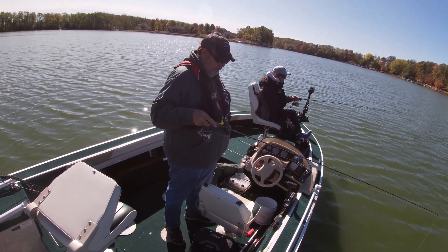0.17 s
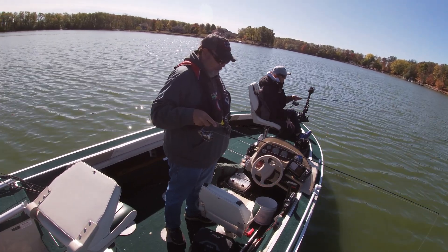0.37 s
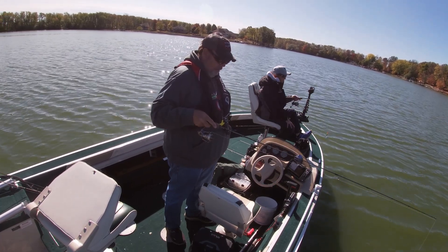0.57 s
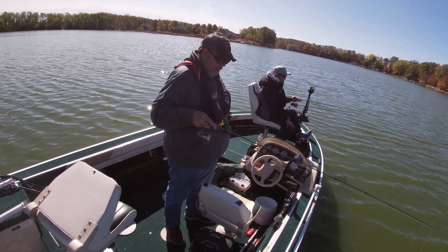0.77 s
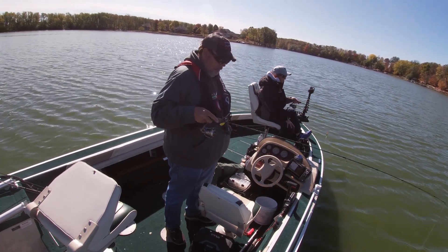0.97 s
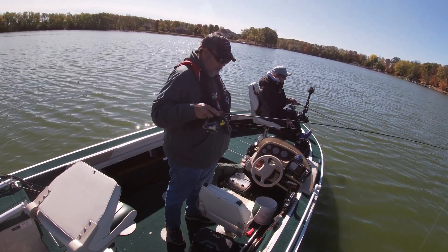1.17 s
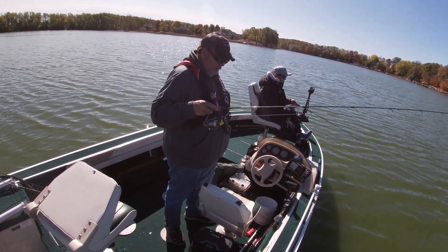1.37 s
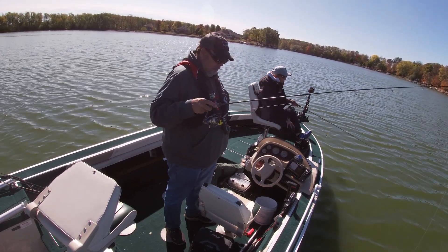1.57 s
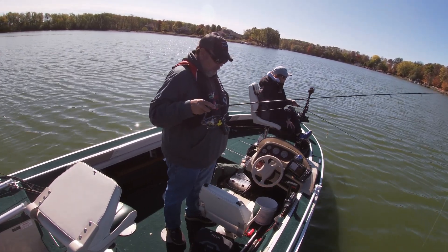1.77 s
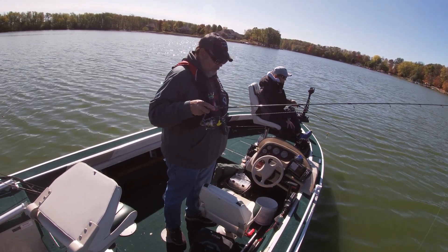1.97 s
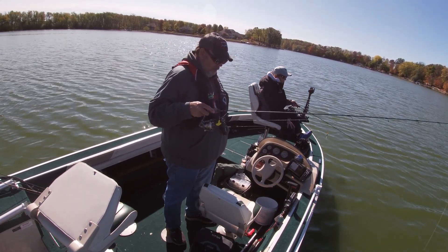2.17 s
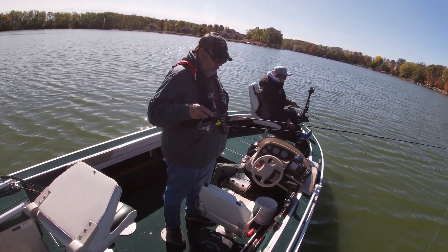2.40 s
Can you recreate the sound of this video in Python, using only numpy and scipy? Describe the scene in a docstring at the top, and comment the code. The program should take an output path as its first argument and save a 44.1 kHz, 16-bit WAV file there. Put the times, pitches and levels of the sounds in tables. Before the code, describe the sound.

Small waves slap a hollow boat hull on an open lake. Dull low knocks with watery plips, tiny gurgles and faint spray cluster from 0.1 to 0.5 seconds, thin out until 1.3, then return, stronger around 1.9 and 2.4. A soft wash continues beneath. Low wind rumbles on the microphone, strongest near 1.2 to 1.3 seconds, over quiet steady hiss and a thin electrical flutter.

```python
"""Lake waves under a boat

Small waves slap a hollow hull: decaying sines ring its modes under a dull burst of noise.
Trapped air plips, gulps and gurgles as short gliding or clustered tones; spray spits in bands of noise.
Light wind rumbles on the microphone in gusts, and ripples keep up a faint wash against the hull.
Under it lie the camera's steady hiss and a thin electrical flutter, both of shaped noise."""
import sys
import numpy as np
from scipy.fft import rfft, irfft, next_fast_len
from scipy.io import wavfile
from scipy.ndimage import uniform_filter1d, map_coordinates

SR = 44100
rng = np.random.default_rng(int(sys.argv[2]) if len(sys.argv) > 2 else 0)


def dump(signal):
    """Clip the signal to [-1, 1] and save it as 16-bit WAV at the path in sys.argv[1]."""
    limited = np.clip(np.atleast_2d(signal).T, -1, 1)
    pcm = np.round(limited * 32767).astype(np.int16)
    wavfile.write(sys.argv[1], SR, pcm)


N = 107471  # length in samples


def amp(db):
    """Decibels to gain."""
    return 10 ** (np.asarray(db) / 20)


def unit(x):
    """Scale to rms 1."""
    return x / np.sqrt(np.mean(x ** 2) + 1e-20)


def along(points, hz):
    """Read (Hz, value) points on a log-frequency axis."""
    point_hz, value = np.transpose(points)
    return np.interp(np.log(hz + 1), np.log(point_hz + 1), value)


def filtered(x, response):
    """Multiply the spectrum of x by a response of frequency, padded so that no tail wraps round."""
    size = next_fast_len(N + SR // 2)
    hz = np.fft.rfftfreq(size, 1 / SR)
    return irfft(rfft(x, size) * response(hz), size)[:N]


def noise(spectrum):
    """Noise of rms 1 coloured by (Hz, dB) points."""
    white = rng.standard_normal(N)
    return unit(filtered(white, lambda hz: amp(along(spectrum, hz))))


def wobble(rate):
    """A smooth random curve through `rate` random knots a second."""
    knots = rng.standard_normal(int(N * rate / SR) + 4)
    return map_coordinates(knots, [np.arange(N) * rate / SR])


def fade(t, t60, attack):
    """Soft onset at t = 0, then exponential decay by 60 dB in t60 seconds."""
    t = np.maximum(t, 0)
    decay = np.exp(-np.log(1000) * t / t60)
    return decay * (1 - np.exp(-t / attack))


def add(track, s, sound):
    """Mix a sound into the track at time s, cut off at the track's end."""
    part = track[max(round(s * SR), 0):][:len(sound)]
    part += sound[:len(part)]


def hull():
    """Each wave gives a dull slap and rings the hull's modes, randomly coloured and detuned each time."""
    # wave slaps, relative ring levels: start_s, low_db, middle_db, upper_db
    knocks = [(0.108, -38.5, -36.5, -58), (0.128, -36, -49.5, -63), (.174, -48.5, -64, -61),
              (0.265, -41, -42, -60), (0.408, -54, -53.5, -72), (.5, -97, -56, -65.5),
              (0.714, -81, -46.5, -70), (.858, -58, -57, -64.5), (1.312, -50, -54, -58),
              (1.334, -46, -45.5, -79), (1.354, -50, -68.5, -62.5), (1.589, -45.5, -52, -57),
              (1.758, -57.5, -58, -67), (1.897, -38.5, -46, -62.5), (1.921, -37.5, -40.5, -59),
              (1.968, -56, -51, -74), (2.214, -51, -54.5, -67), (2.339, -44.5, -52, -52),
              (2.395, -37, -39.5, -48.5), (2.418, -39, -56, -58)]
    # modes of the hull at rest: pitch_hz, relative_level_db, t60_s
    hull_modes = [(142.3, -9, 0.25), (186.2, 2, 0.13), (213.2, 4, 0.097), (306.6, -1, 0.097),
                  (344.3, -2, 0.13), (360.4, -2, 0.11), (405, -13, 0.091), (496, 0, 0.093), (557, -12, 0.2),
                  (668, -1.5, 0.07), (736.5, -9, 0.098)]
    # pitches at which a knock's three ring levels apply: pitch_hz
    ring_hz = [182, 330.5, 525]
    # colour of the dull slap: frequency_hz, relative_level_db
    slap_colour = [(60, -6.5), (150, 10.5), (350, -3), (480, -29), (800, -29.5), (1500, -23.5), (4000, -64)]
    waterline_detune = 0.035  # spread of each mode's shift from wave to wave, as a share of its pitch
    knock_trim_db, knock_attack_cycles, mode_scatter_db = -1.5, 2.5, 2.5
    slap_trim_db, slap_t60_s, slap_attack_s = -9, 0.11, 0.0021

    out, t = np.zeros(N), np.arange(SR // 3) / SR
    force, clock = np.zeros(N), np.arange(N) / SR
    rest_hz, mode_db, t60 = np.transpose(hull_modes)
    for s, *ring_db in knocks:
        hz = rest_hz * np.exp(waterline_detune * rng.standard_normal(len(rest_hz)))
        envelopes = fade(t, t60[:, None], knock_attack_cycles / hz[:, None])
        modes = np.sin(2 * np.pi * hz[:, None] * t) * envelopes
        colour_db = np.interp(np.log(hz), np.log(ring_hz), ring_db)
        colour_db += mode_scatter_db * rng.standard_normal(len(hz))
        add(out, s, amp(knock_trim_db + mode_db + colour_db) @ modes)
        # the middle ring level also sets how hard the wave slaps
        force += amp(ring_db[1]) * fade(clock - s, slap_t60_s, slap_attack_s)
    return out + amp(slap_trim_db) * force * noise(slap_colour)


def plips():
    """Single air pockets ring briefly and glide up or down as they change size."""
    # air pockets: start_s, pitch_hz (at the start), level_db, t60_s, rise_octaves_per_s
    pockets = [(0.1004, 1450, -43, 0.013, -3), (.19, 990, -54.5, 0.043, 4), (.205, 717, -56, 0.078, -2),
               (.219, 391, -57, 0.068, 2), (.311, 1286, -70, 0.084, 26), (.325, 900, -60.5, 0.024, -7),
               (.377, 1980, -64.5, 0.036, -6), (.406, 385, -59.5, 0.079, -1), (.497, 734, -51, 0.033, 8),
               (.502, 374, -58.5, 0.035, 9), (.717, 770, -57, 0.025, 3), (.729, 741, -59.5, 0.054, 1.5),
               (.866, 482, -55.5, 0.04, 6), (.9295, 2910, -55.5, 0.011, 10), (1.24, 933, -62, 0.044, 4.5),
               (1.289, 779, -50.5, 0.043, -5), (1.312, 483, -52.5, 0.057, -9.5), (1.59, 485, -56, 0.06, 4),
               (1.621, 1745, -58.5, 0.027, 2), (1.691, 4670, -61.5, 0.04, -5),
               (1.701, 786, -49.5, 0.013, 2), (1.709, 788, -55, 0.045, -2.5),
               (1.714, 2830, -61.5, 0.019, -4), (1.742, 897, -53.5, 0.047, 4),
               (1.757, 314.5, -49.5, 0.12, -0.5), (1.922, 675, -56, 0.05, 2),
               (2.206, 1160, -51.5, 0.011, -19), (2.338, 625, -54.5, 0.058, 3.5),
               (2.398, 597, -56, 0.036, 11.5)]
    out, t = np.zeros(N), np.arange(SR // 12) / SR
    for s, hz, db, t60, rise in pockets:
        phase = 2 * np.pi * np.cumsum(hz * 2 ** (rise * t)) / SR
        add(out, s, amp(db) * np.sin(phase) * fade(t, t60, attack=0.0012))
    return out


def gulps():
    """A cavity sings while it fills with water: the pitch climbs ever faster until it closes."""
    # filling cavities: start_s, length_s, first_pitch_hz, last_pitch_hz, level_db (before the waver)
    cavities = [(.157, 0.038, 872, 1704, -64), (0.218, 0.031, 960, 2320, -73.5)]
    curve, edge_s, waver_db = 1.6, 0.0061, 3.5
    out, clock = np.zeros(N), np.arange(N) / SR
    for s, length, first_hz, last_hz, db in cavities:
        t = clock - s
        filling = np.clip(t / length, 0, 1) ** curve
        hz = first_hz * (last_hz / first_hz) ** filling
        swell = np.clip(np.minimum(t, length - t) / edge_s, 0, 1)
        tone = np.sin(2 * np.pi * np.cumsum(hz) / SR)
        out += amp(db + waver_db * wobble(200)) * swell * tone
    return out


def gurgles():
    """Water folding against the side sheds clusters of tiny bubbles, each a short decaying sine."""
    # bubble clusters: start_s, length_s, centre_pitch_hz, weakest_bubble_db
    clusters = [(0.091, .016, 1400, -73), (0.152, 0.053, 533, -72), (0.176, .044, 983, -77),
                (0.276, .032, 726, -78), (0.365, 0.019, 1920, -78.5), (0.503, 0.019, 1300, -79),
                (1.287, .03, 695, -72.5), (1.618, 0.011, 1460, -73), (1.727, 0.022, 1290, -74),
                (1.909, .035, 698, -73)]
    bubbles_per_s = 660
    bubble_cycles = 18.7  # cycles in which a bubble falls by 60 dB
    bubble_spread = 0.29  # standard deviation of the natural log of pitch
    out, t = np.zeros(N), np.arange(SR // 20) / SR
    for s, length, hz, db in clusters:
        draws = rng.random((64, 3))
        count = int(np.clip(length * bubbles_per_s, 2, len(draws)))
        for k, (late, size, strength) in enumerate(draws[:count]):
            # sqrt(12) brings the uniform draw to a standard deviation of 1
            pitch = hz * np.exp(bubble_spread * np.sqrt(12) * (size - .5))
            ring = np.sin(2 * np.pi * pitch * t) * fade(t, bubble_cycles / pitch, 1 / pitch)
            start = s + length * (k + late) / count
            add(out, start, amp(db + 17.9 * strength) * ring)
    return out


def splashes():
    """Droplets and crests breaking on the side: grainy spits of noise in a broad band round a pitch."""
    # spits of spray: start_s, centre_hz, level_db (before the fade), t60_s
    spits = [(0.099, 3400, -70.5, 0.048), (0.191, 1900, -68, 0.042), (0.265, 3230, -67, 0.04),
             (0.496, 2130, -58.5, 0.018), (1.289, 3660, -67.5, 0.11), (1.328, 1600, -60, 0.023),
             (1.392, 2640, -67.5, .025), (1.7, 4400, -64, 0.057), (1.747, 1610, -61.5, 0.02),
             (1.92, 3180, -65, .02), (2.078, 750, -59, 0.0099), (2.207, 1040, -59.5, 0.04)]
    half_width_octaves, grain_db = .55, 3
    out, t = np.zeros(N), np.arange(SR // 8) / SR
    octave = np.log2(np.fft.rfftfreq(len(t), 1 / SR) + 1)
    for s, hz, db, t60 in spits:
        band = np.exp(-((octave - np.log2(hz)) / half_width_octaves) ** 4)
        drops = rng.standard_normal(len(t)) * amp(grain_db * wobble(842)[:len(t)])
        spray = unit(irfft(rfft(drops) * band, len(t)))
        add(out, s, amp(db) * spray * fade(t, t60, attack=.0015))
    return out


def wash():
    """Ripples keep the hull murmuring between the slaps: coloured noise that swells slightly."""
    # how hard the ripples stir the hull: time_s, level_db (before the swell)
    ripples = [(0, -59.5), (.4, -62), (1.049, -64), (1.45, -62.5), (1.898, -61.5), (2.44, -63)]
    # colour of the murmur: frequency_hz, relative_level_db
    wash_colour = [(20, -14.5), (60, -2.5), (90, 4), (125, -2.5), (180, -5.5), (260, -10), (350, -17.5),
                   (470, -26), (620, -30.5), (780, -23.5), (1100, -32), (2000, -36.5), (5000, -46),
                   (12000, -73)]
    swell_db = 1
    s, db = np.transpose(ripples)
    level_db = np.interp(np.arange(N) / SR, s, db)
    return noise(wash_colour) * amp(level_db + swell_db * wobble(7.9))


def wind():
    """Gusts buffet the microphone with a deep rumble of noise."""
    # strength of the gusts: time_s, relative_level_db
    gusts = [(0, -52), (.06, -51), (.13, -66), (.27, -63), (.37, -53), (.47, -56), (.6, -64), (.66, -55),
             (.82, -60), (.94, -54), (1.09, -58), (1.17, -43), (1.31, -43), (1.38, -51), (1.54, -53),
             (1.6, -67), (1.67, -51), (1.93, -48), (2.02, -55), (2.14, -48), (2.19, -56), (2.26, -50),
             (2.44, -54)]
    # colour of the rumble: frequency_hz, relative_level_db
    rumble_colour = [(8, -30.5), (20, -5.5), (30, 2), (42, -13), (55, -13.5), (75, -12.5), (110, -42.5),
                     (200, -68), (400, -100)]
    wind_trim_db, buffet_db = 2.5, 1
    s, db = np.transpose(gusts)
    rumble = noise(rumble_colour)
    # even out the noise's own swells, so that the gusts set the level
    power = np.abs(uniform_filter1d(rumble ** 2, size=SR // 12))
    rumble /= np.sqrt(power + 1e-6)
    gust_db = np.interp(np.arange(N) / SR, s, db)
    return rumble * amp(wind_trim_db + gust_db + buffet_db * wobble(11.91))


def camera_noise():
    """Steady hiss and a thin electrical flutter: noise bands pulsing about thirty times a second."""
    # colour of the hiss: frequency_hz, relative_level_db
    hiss_colour = [(100, -1), (2000, 3), (3500, 2), (4600, 2), (6500, 2), (7600, -2), (8400, -5.5),
                   (10000, -6), (11500, -18.5), (13000, -18), (16000, -25)]
    # bursts in each flutter cycle, both widths half the distance from centre to 1/e:
    # time_in_cycle_s, width_s, centre_hz, bandwidth_hz, level_db (at the peak, before the scatter)
    bursts = [(.017, 0.0011, 6530, 290, -78.5), (0.028, 0.0038, 6540, 483, -77),
              (0.029, 0.0026, 9900, 840, -90), (0.032, 0.0025, 4600, 230, -86)]
    hiss_db, flutter_hz, scatter_db = -81.5, 29.94, 3
    t = np.arange(N) / SR
    out = amp(hiss_db) * noise(hiss_colour)
    for s, width, centre_hz, band_hz, db in bursts:
        # time from the nearest burst centre
        offset = (((t - s) * flutter_hz + .5) % 1 - .5) / flutter_hz
        pulse = np.exp(-(offset / width / 2) ** 2)
        white = rng.standard_normal(N)
        band = unit(filtered(white, lambda hz: np.exp(-((hz - centre_hz) / band_hz / 2) ** 2)))
        out += band * pulse * amp(db + scatter_db * wobble(90))
    return out


def scene():
    """Water on the hull, wind and the camera's own noise at one microphone."""
    water = hull() + plips() + gulps() + gurgles() + splashes() + wash()
    return (water + wind() + camera_noise())[None]


def record(dry):
    """The camera keeps nothing from its band limit upwards."""
    top_hz = 15800
    return filtered(dry[0], lambda hz: hz < top_hz)[None]


dry = scene()
out = record(dry)
dump(out)
```